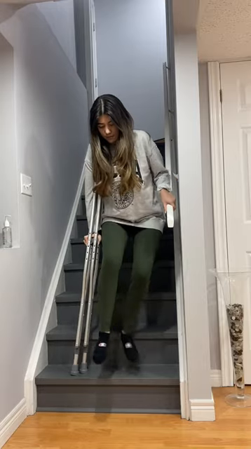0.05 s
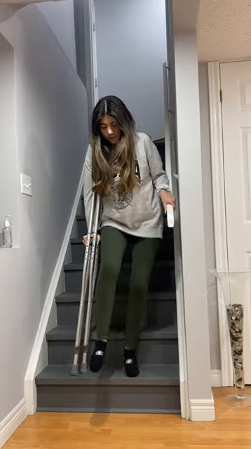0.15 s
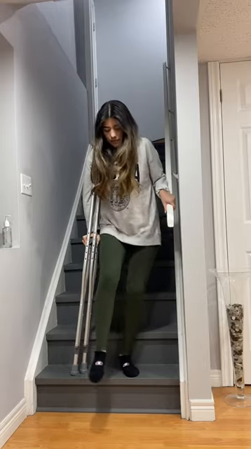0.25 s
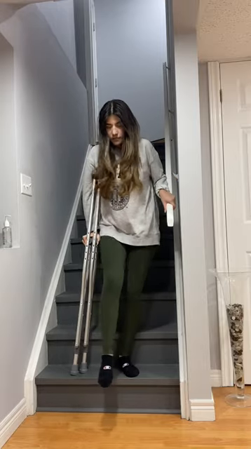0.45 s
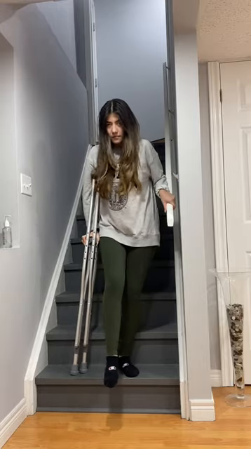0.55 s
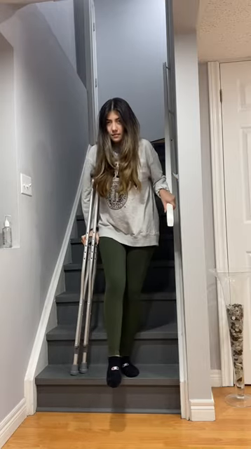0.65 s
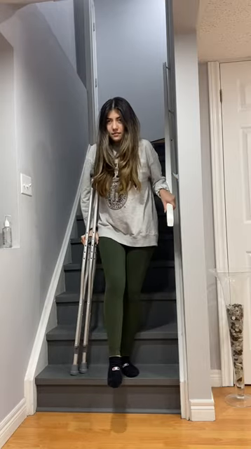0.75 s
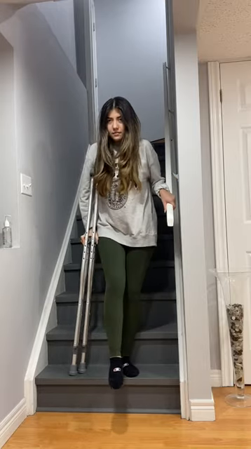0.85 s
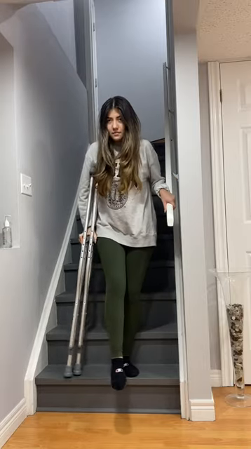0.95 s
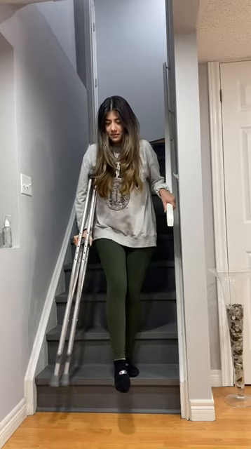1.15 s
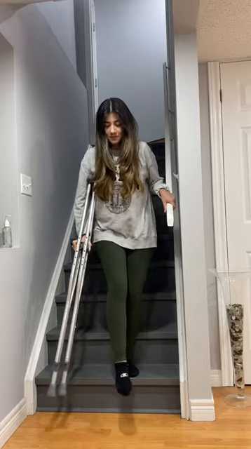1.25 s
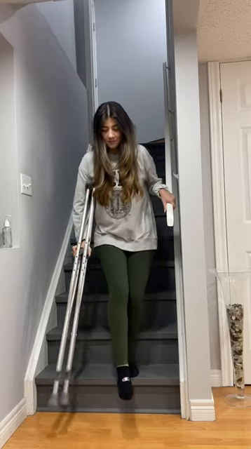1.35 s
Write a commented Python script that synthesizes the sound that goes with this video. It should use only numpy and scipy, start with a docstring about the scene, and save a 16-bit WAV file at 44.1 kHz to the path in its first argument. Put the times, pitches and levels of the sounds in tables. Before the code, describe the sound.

One booming footstep on wooden stairs, with a metal crutch clacking and ticking.

```python
"""A wooden stair booms under a heavy step: someone on crutches comes down in a quiet house.
A crutch clacks as it takes the weight, its metal tube ringing. A socked foot brushes the tread,
then lands in soft pushes that drive the modes of the hollow staircase; the treads flex and rumble.
The crutches tick and faintly squeak as they unload. Step and crutches echo in the stairwell.
Clothes rustle over ventilation rumble and mains hum."""
import sys
import numpy as np
from scipy import signal
from scipy.fft import rfft, irfft
from scipy.io import wavfile

SR = 44100
rng = np.random.default_rng(int(sys.argv[2]) if len(sys.argv) > 2 else 0)


def bounce(signal):
    """Save signal as a 16-bit WAV file at the path given by the first command-line argument."""
    frames = np.transpose(np.atleast_2d(signal))
    limited = np.clip(frames, -1, 1)
    pcm = np.round(limited * 32767).astype(np.int16)
    wavfile.write(sys.argv[1], SR, pcm)


N = 61739

# pushes on the tread: t/s, level/dB, contact/s
PUSHES = [(.049, -29.5, 0.0021), (0.102, -20, 0.007), (0.125, -11.5, 0.0091), (0.2042, -14.5, 0.0011),
          (.2087, -2, 0.0034), (0.2179, 2, 0.0089), (0.2311, 2.5, 0.005), (0.2463, -5.5, 0.0051),
          (0.2805, -5.5, 0.00605), (0.3352, -11, 0.0079), (.412, -20.5, 0.0061), (0.7534, -39.5, 0.0015),
          (0.781, -32.5, 0.0026)]
# staircase modes: f/Hz, level/dB, t60/s, left minus right/dB
STAIR_MODES = [(48.9, 0.5, 0.32, -2), (93.3, -4.5, 0.2, 1), (108.4, -3, 0.2, 2), (168.4, 3, .14, -6.5),
               (207, -13, 0.28, 5.5), (290, -11.5, 0.17, -1), (335.1, 2, 0.25, -4), (380.7, -5, 0.14, 11.5),
               (423.6, -3.5, 0.23, 4.5), (605, -25, 0.22, -20.5), (920, -11.5, 0.24, 9),
               (985, -8, 0.084, -14)]
# tread flex envelope: t/s, level/dB
FLEX_ENVELOPE = [(0, -47.5), (.09, -50.5), (.15, -37), (.19, -51.5), (.3, -46), (.42, -40.5), (.48, -55),
                 (.92, -59.5), (.98, -49), (1.05, -40), (1.12, -48), (1.4, -72)]
# tread flex spectrum: f/Hz, level/dB
FLEX_SPECTRUM = [(25, -26.5), (42, 6), (55, -6.5), (88, -1), (120, -12.5), (170, -12.5), (260, -51),
                 (1000, -103)]
# crutch clack, then ticks: t/s, level/dB, centre/Hz, width/Hz, relative ring/dB, relative crack/dB
CRUTCH_KNOCKS = [(0.0487, -39, 2610, 780, -9.5, -4), (0.192, -56.5, 3500, 4000, -12, -16),
                 (0.7517, -57, 4800, 2940, -21, -9), (0.7564, -57.5, 1160, 1850, -24, -9),
                 (.782, -54.5, 5200, 1500, -22, -12.5), (0.8765, -46.5, 4970, 1900, -21.5, -16),
                 (.878, -55, 9800, 2190, -32, -28), (1.048, -60.5, 9800, 3500, -35, -15),
                 (1.089, -61.5, 1390, 400, -26, -22), (1.3668, -54.5, 3250, 3600, -19.5, -11)]
# metal tube modes: f/Hz, level/dB, t60/s
TUBE_MODES = [(1760, -11, .1), (2074, -8, 0.055), (2390, -3.5, .11), (2485, -6, 0.046), (2540, -19, 0.089),
              (3400, -10, 0.072), (4040, -10, .05)]
# squeaks of the turning tube: t/s, length/s, level/dB
TUBE_SQUEAKS = [(.655, .065, -74), (.94, .035, -75)]
# sock scuffs: peak t/s, rise/s, fall/s, level/dB
SOCK_SCUFFS = [(0.106, 0.037, 0.036, -50), (0.181, 0.073, 0.028, -61), (0.209, 0.011, 0.044, -45.5),
               (.236, 0.024, 0.049, -48.5), (.305, 0.03, .035, -56)]
# sock friction spectrum: f/Hz, level/dB
SOCK_SPECTRUM = [(100, 6.5), (350, 9), (560, 3.5), (950, 1.5), (1500, -1.5), (2800, -4), (5500, -7),
                 (8000, -15), (11000, -11), (16000, -16)]
# cloth rustle envelope: t/s, level/dB
RUSTLE_ENVELOPE = [(0, -100), (.38, -77), (.48, -81), (.72, -77.5), (.78, -75), (.85, -82), (.92, -68.5),
                   (1.0, -103), (1.12, -85), (1.18, -74), (1.27, -76), (1.37, -66), (1.4, -64.5)]
# cloth rustle spectrum: f/Hz, level/dB
RUSTLE_SPECTRUM = [(200, 5.5), (800, -5), (1600, 3.5), (3200, 4), (5500, 2), (8000, -4.5), (11000, 0.5),
                   (16000, -18.5)]
# dull rubbing envelope: t/s, level/dB
RUB_ENVELOPE = [(0, -65), (.08, -56), (.17, -47), (.33, -50.5), (.45, -73), (.58, -103), (.70, -63.5),
                (.78, -52), (.88, -71), (1.0, -65.5), (1.2, -62), (1.4, -66.5)]
# dull rubbing spectrum: f/Hz, level/dB
RUB_SPECTRUM = [(60, -22), (170, 2), (270, 4.5), (430, 0), (540, -13), (850, -13.5), (1300, -59),
                (5000, -62)]
# ventilation spectrum: f/Hz, level/dB
VENT_SPECTRUM = [(20, -24), (33, -17.5), (45, -2), (62, -0.5), (85, -3.5), (120, -5.5), (160, -14.5),
                 (195, -22), (270, -17.5), (420, -26.5), (560, -29.5), (1000, -42), (2900, -49.5),
                 (3350, -41), (3750, -64.5), (10000, -57.5), (16000, -76)]
# mains hum: f/Hz, rms level/dB
HUM_TONES = [(118.3, -49.5), (59.5, -54)]
# stairwell decay: f/Hz, t60/s
STAIRWELL_T60 = [(80, 0.13), (300, 0.5), (1000, 0.16), (3000, 0.44), (6000, 0.44), (15000, 0.17)]
# left-right likeness of noise: f/Hz, correlation
STEREO_CORRELATION = [(30, 0.91), (95, 0.98), (170, 0.78), (300, 0.53), (550, -0.63), (1200, -0.23),
                      (4000, 0.11), (9000, -0.014), (14000, 0.17)]
# microphone dips: f/Hz, half width/Hz, depth/dB
MIC_DIPS = [(7283, 710, 22), (13300, 1230, 38)]


def stair(give_db=-5, give_s=0.0049, boom_db=-20, echo_db=-18.5):
    """Soft pushes press the tread down and ring the hollow staircase; it flexes under the load."""
    t, force = np.arange(SR) / SR, np.zeros(N)
    for start_s, db, contact_s in PUSHES:
        u = 4 * t / contact_s
        push = u ** 2 * np.exp(-2 * u)
        add(force, start_s, amp(db) * push / push.sum())
    give = amp(give_db) * (1 - t / give_s) * np.exp(-t / give_s)
    response = []
    for side in (1, -1):
        modes = [(hz, db + side * pan_db / 2, t60_s) for hz, db, t60_s, pan_db in STAIR_MODES]
        response.append(give + ring(modes, t))
    boom = -amp(boom_db) * signal.fftconvolve(force[None], np.array(response), axes=1)[:, :N]
    flex = envelope(FLEX_ENVELOPE) * noise(FLEX_SPECTRUM)
    return boom + amp(echo_db) * stairwell(boom.mean(0)) + flex


def crutches(right_lag_samples=1, echo_db=-1.5):
    """Knocks and squeaks, direct and off the stairwell walls."""
    direct = knocks() + squeaks()
    return np.array([direct, np.roll(direct, right_lag_samples)]) + amp(echo_db) * stairwell(direct)


def knocks(chatter_s=0.001, crack_s=0.0026):
    """Loose crutch parts chatter with a bright crack; the metal tube rings on."""
    t, out = np.arange(SR // 4) / SR, np.zeros(N)
    tube = ring(TUBE_MODES, t)
    decay = np.exp(-t / chatter_s)
    for start_s, db, centre_hz, width_hz, tube_db, crack_db in CRUTCH_KNOCKS:
        top_hz = min(np.hypot(centre_hz, width_hz / 2) + width_hz / 2, SR * .45)
        band = signal.butter(2, [max(top_hz - width_hz, 100), top_hz], "band", fs=SR, output="sos")
        chatter, crack = rng.standard_normal((2, len(t)))
        chatter = signal.sosfilt(band, chatter)[::-1] * decay  # reversed: no filter rise at onset
        chatter *= np.linalg.norm(decay) / np.linalg.norm(chatter)
        crack = unit(np.diff(crack, prepend=0)) * np.exp(-t / crack_s)
        add(out, start_s, amp(db) * (chatter + amp(crack_db) * crack + amp(tube_db) * tube))
    return out


def squeaks(pitch_hz=1765, waver=.024, slips_per_s=400):
    """The tube squeaks as it turns; slips jitter the pitch."""
    out = np.zeros(N)
    for start_s, length_s, db in TUBE_SQUEAKS:
        t = np.arange(0, length_s, 1 / SR)
        cycles = np.cumsum(pitch_hz * (1 + waver * jitter(t, slips_per_s))) / SR
        swell = np.sin(np.pi * t / length_s) ** 2
        add(out, start_s, amp(db) * swell * np.sin(2 * np.pi * cycles))
    return out


def sock():
    """Grainy swishes swell and fade as the foot slides and settles."""
    t, power = np.arange(N) / SR, np.zeros(N)
    for peak_s, rise_s, fall_s, db in SOCK_SCUFFS:
        swell = np.exp(np.minimum((t - peak_s) / rise_s, (peak_s - t) / fall_s))
        power += (amp(db) * swell) ** 2
    return np.sqrt(power) * noise(SOCK_SPECTRUM) * fibre_grain()


def clothes():
    """Bright cloth rustle and dull rubbing as the weight shifts."""
    rustle = envelope(RUSTLE_ENVELOPE) * noise(RUSTLE_SPECTRUM) * fibre_grain()
    rub = envelope(RUB_ENVELOPE) * noise(RUB_SPECTRUM)
    return rustle + rub


def fibre_grain(depth_db=1.5, grains_per_s=2500):
    """Fast uneven gain of fibres catching and letting go."""
    return unit(amp(-depth_db * jitter(np.arange(N) / SR, grains_per_s)))


def stairwell(x, early_db=6.5, early_s=0.014, onset_s=0.0015, low_cut_hz=156):
    """Stereo echo: strong near walls, then a tail with a t60 per band."""
    hz, t, bands = signal.stft(rng.standard_normal((2, SR // 2)), SR, nperseg=256)
    decay = np.exp(-np.log(1000) * t / at_hz(STAIRWELL_T60, hz)[:, None])
    near_walls = 1 + amp(early_db) * np.exp(-t / early_s)
    tail = signal.istft(bands * decay * near_walls, SR, nperseg=256)[1]
    tail *= np.minimum(np.arange(tail.shape[1]) / SR / onset_s, 1)
    tail = signal.sosfilt(signal.butter(2, low_cut_hz, "high", fs=SR, output="sos"), tail)
    return signal.fftconvolve(x[None], tail / np.linalg.norm(tail[0]), axes=1)[:, :N]


def house(vent_db=-50):
    """Ventilation rumble and mains hum."""
    t = np.arange(N) / SR
    hum = sum(amp(db) * np.sin(2 * np.pi * (hz * t + rng.random())) for hz, db in HUM_TONES)
    return amp(vent_db) * noise(VENT_SPECTRUM) + np.sqrt(2) * hum


def amp(db):
    """dB to gain."""
    return 10 ** (np.asarray(db) / 20)


def unit(x):
    """Scale to rms 1."""
    return x / np.sqrt(np.mean(x ** 2) + 1e-20)


def at_hz(table, hz):
    """Interpolate over log frequency."""
    table_hz, values = np.transpose(table)
    return np.interp(np.log(hz + 1), np.log(table_hz + 1), values)


def envelope(table):
    """Gain curve from t/s, level/dB."""
    return amp(np.interp(np.arange(N) / SR, *np.transpose(table)))


def jitter(t, rate_hz):
    """Gaussian values at rate_hz, joined by lines."""
    return np.interp(t * rate_hz, np.arange(N), rng.standard_normal(N))


def add(mix, start_s, sound):
    """Mix in at start_s."""
    part = mix[max(round(start_s * SR), 0):][:len(sound)]
    part += sound[:len(part)]


def noise(spectrum):
    """Coloured stereo noise, rms 1; channels alike in the bass, nearly unrelated in the treble."""
    hz = np.fft.rfftfreq(N, 1 / SR)
    left, spare = rfft(rng.standard_normal((2, N)))
    correlation = np.clip(at_hz(STEREO_CORRELATION, hz), -1, 1)
    right = correlation * left + np.sqrt(1 - correlation ** 2) * spare
    return unit(irfft(np.array([left, right]) * amp(at_hz(spectrum, hz)), N))


def ring(modes, t):
    """Sum of damped sines."""
    return sum(amp(db) * np.exp(-np.log(1000) * t / t60_s) * np.sin(2 * np.pi * hz * t)
               for hz, db, t60_s in modes)


def scene():
    """All sources at the foot of the stairs."""
    return stair() + crutches() + sock() + clothes() + house()


def record(dry, low_cut_hz=46.8, band_limit_hz=15950):
    """Microphone: two narrow treble dips, bass roll-off, band limit."""
    hz = np.fft.rfftfreq(2 * N, 1 / SR)
    dips_db = sum(db * np.exp(-2 * ((hz - dip_hz) / half_hz) ** 2) for dip_hz, half_hz, db in MIC_DIPS)
    coloured = irfft(rfft(dry, 2 * N) * amp(-dips_db))[:, :N]
    coloured = signal.sosfilt(signal.butter(4, low_cut_hz, "high", fs=SR, output="sos"), coloured)
    lowpass = signal.firwin(511, band_limit_hz, window=("kaiser", 9), fs=SR)
    return signal.oaconvolve(coloured, lowpass[None], "same")


dry = scene()
out = record(dry)
bounce(out)
```